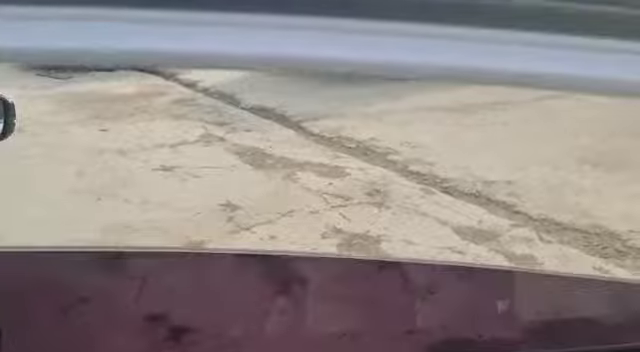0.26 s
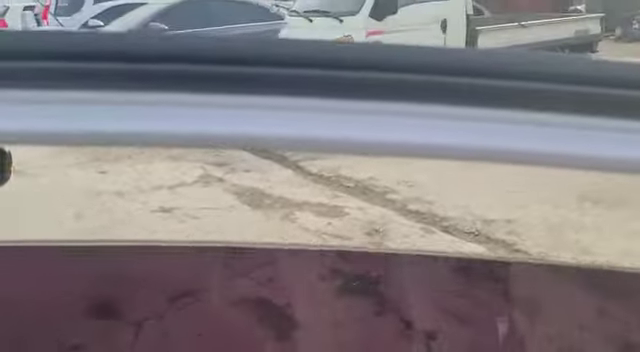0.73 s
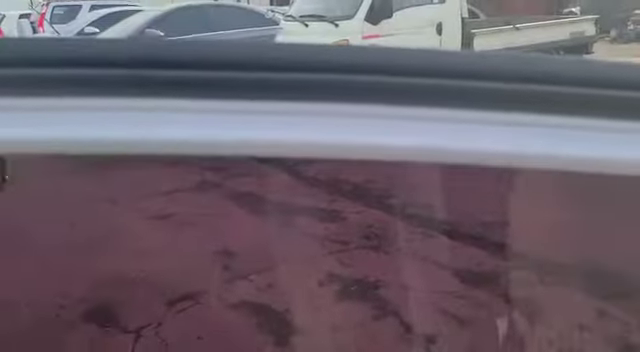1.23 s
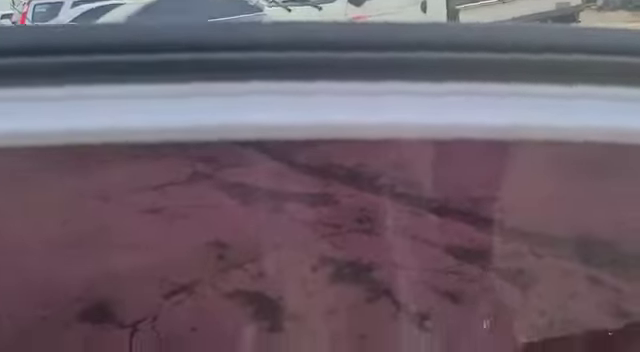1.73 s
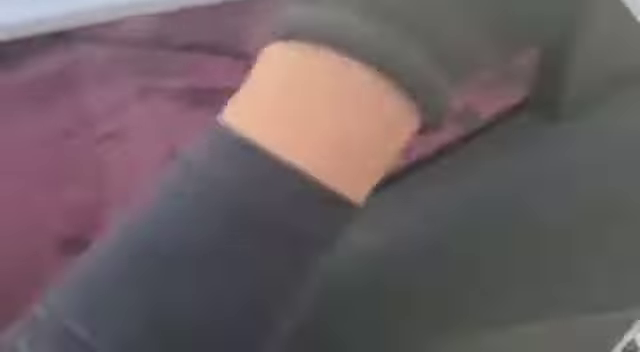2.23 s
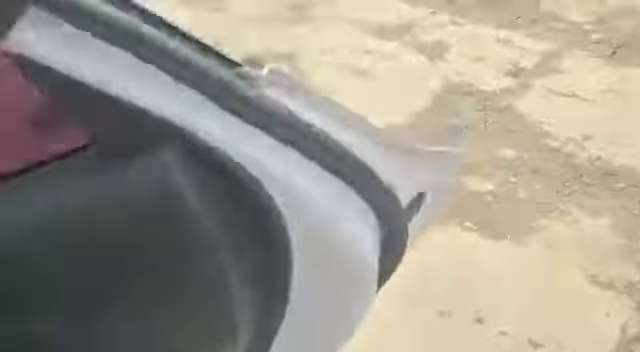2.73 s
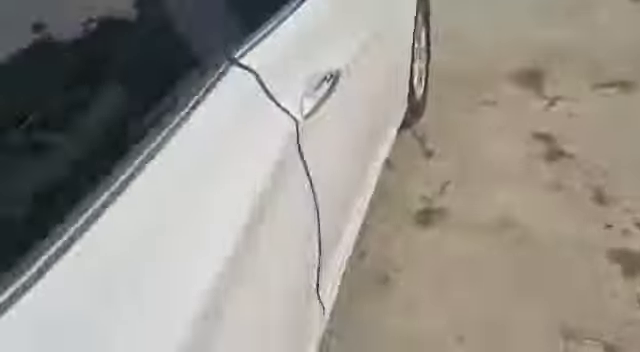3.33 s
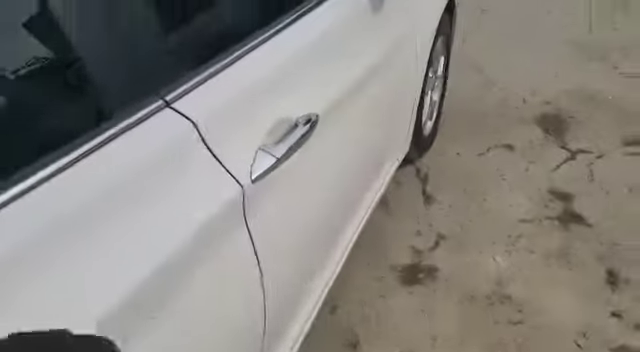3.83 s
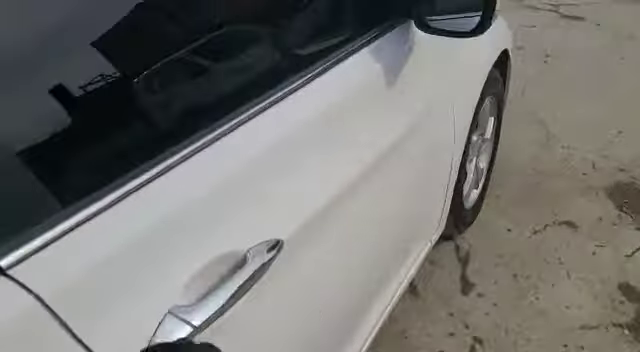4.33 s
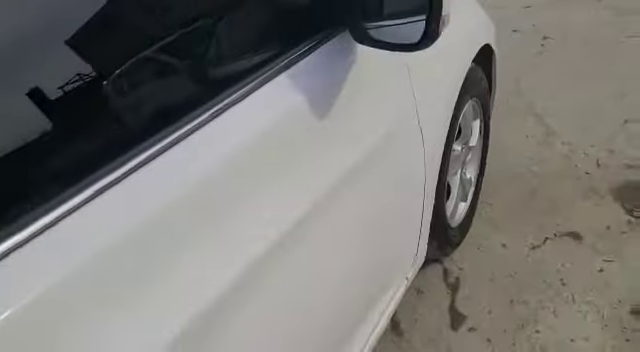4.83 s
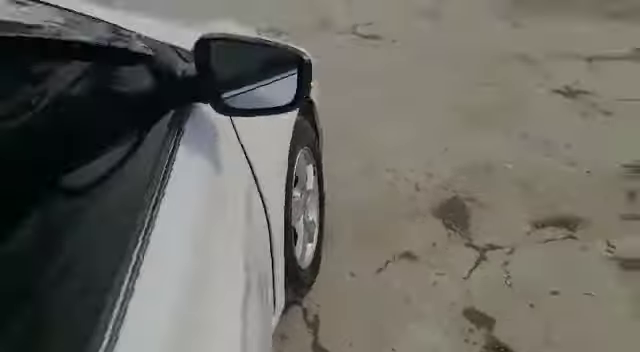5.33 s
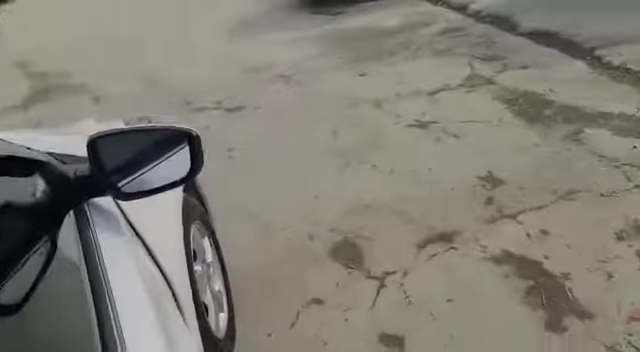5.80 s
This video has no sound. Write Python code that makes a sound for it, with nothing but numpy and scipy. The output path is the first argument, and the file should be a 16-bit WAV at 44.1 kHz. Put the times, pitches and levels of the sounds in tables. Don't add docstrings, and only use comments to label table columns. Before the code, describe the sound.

Beside an idling engine, an electric window closes with a squeak and thump; fabric rubs, a car door slams hard, then latch clacks and small ticks.

```python
import sys
import numpy as np
from scipy import signal
from scipy.fft import rfft, irfft, next_fast_len
from scipy.io import wavfile

SR = 44100
rng = np.random.default_rng(int(sys.argv[2]) if len(sys.argv) > 2 else 0)


def volts_from_db(level):
    exponent = np.asarray(level, float) / 20
    return 10 ** exponent


def transcribe(signal):
    frames = np.atleast_2d(signal).T
    limited = np.clip(frames, -1, 1)
    pcm = np.round(limited * 32767).astype(np.int16)
    wavfile.write(sys.argv[1], SR, pcm)


N = 267246


def rms_one(x):
    return x / np.sqrt(np.mean(x ** 2) + 1e-20)


def in_time(rows):
    s, *columns = np.transpose(rows)
    return [np.interp(np.arange(N) / SR, s, c) for c in columns]


def at_hz(points, hz):
    points = np.array(points)
    return np.interp(np.log(hz), np.log(points[:, 0]), points[:, 1])


def drift(rate_hz):
    r = np.exp(-80 * np.pi * rate_hz / SR)
    white = rng.standard_normal(N // 40 + 2002)
    slow = signal.lfilter([1], [1, -2 * r, r * r], white)[2000:]
    return np.interp(np.arange(N) / 40, np.arange(len(slow)), rms_one(slow))


def resonate(x, hz, width_hz):
    r = np.exp(-np.pi * width_hz / SR)
    zeros = (1 - r * r) / 2 * np.array([1, 0, -1])
    return signal.lfilter(zeros, [1, -2 * r * np.cos(2 * np.pi * hz / SR), r * r], x)


def through(x, resonances):
    return sum((-1) ** k * volts_from_db(db) * resonate(x, hz, width)
               for k, (hz, width, db) in enumerate(resonances))


def orders(hz, table, wobble_db):
    turn = 2 * np.pi * np.cumsum(hz) / SR
    out = 0
    for multiple, db in table:
        level = np.sqrt(2) * volts_from_db(db + wobble_db * drift(0.87))
        out = out + level * np.sin(multiple * turn + rng.uniform(0, 2 * np.pi))
    return out


def strokes(rows, column=3):
    t = np.arange(N) / SR
    out = 0
    for row in rows:
        peak_s, swell_s, fade_s = row[:3]
        away = np.maximum((peak_s - t) / swell_s, (t - peak_s) / fade_s)
        out = out + volts_from_db(row[column] - 20 * away)
    return out


# frequency in Hz, density in dB per Hz.
RUMBLE_COLOUR = [(20, -1.5), (60, -7.5), (90, -13.5), (160, -17.5), (250, -18), (330, -14.5), (470, -15),
                 (560, -12.5), (650, -18), (750, -20.5)]
# frequency in Hz, density in dB per Hz.
HISS_COLOUR = [(700, 1.5), (800, 4), (1000, 4), (1600, 4), (2400, 1.5), (3300, -2.5), (5000, -8.5),
               (6700, -1.5), (7500, -4.5), (8500, -17), (11500, -6), (15000, -11), (15800, -9),
               (16200, -50)]
# frequency in Hz, likeness from 0 to 1.
PORT_LIKENESS = [(30, 0.69), (250, 1), (700, 0.36), (1500, 0.05), (3000, 0.063), (6000, 0.22),
                 (12000, 0.08)]
# time in seconds, level in dB.
TRAFFIC_LEVEL = [(0, -42), (1.6, -41.5), (1.96, -44), (2.2, -39), (2.55, -46), (3.4, -39.5), (3.8, -45),
                 (4.12, -52), (4.5, -44), (5.2, -37), (6.06, -43.5)]
# time in seconds, level in dB about the mean.
LOT_OPENNESS = [(0, 1.5), (1.3, 2.5), (1.96, -2), (2.2, 0.5), (2.85, 3), (3.0, -.5), (3.36, 2), (3.7, -2.5),
                (4.5, 1.5), (5.0, 1), (5.7, -1.5), (6.06, -3.5)]


def air(patchy_db):
    size, join_hz = next_fast_len(N), 700
    hz = np.maximum(np.fft.rfftfreq(size, 1 / SR), 10)
    join_db = at_hz(RUMBLE_COLOUR, join_hz) - at_hz(HISS_COLOUR, join_hz)
    colour_db = np.where(hz < join_hz, at_hz(RUMBLE_COLOUR, hz), at_hz(HISS_COLOUR, hz) + join_db)
    colour = volts_from_db(colour_db) * (hz > 15)
    alike = np.clip(at_hz(PORT_LIKENESS, hz), 0, 1)
    mid, side = rfft(rng.standard_normal((2, size))) * colour
    pair = np.sqrt(1 + alike) * mid + np.sqrt(1 - alike) * side * np.array([[1], [-1]])

    (traffic_db,), (open_db,) = in_time(TRAFFIC_LEVEL), in_time(LOT_OPENNESS)
    # level in dB, share of the openness swing
    hisses = [(-47, 0.98), (-52.5, 1), (-60, 1.27)]
    levels_db = [traffic_db] + [db + share * open_db for db, share in hisses]
    edges_hz, out = [8, 250, 2500, 8500, SR], 0
    for low, high, db in zip(edges_hz, edges_hz[1:], levels_db):
        cuts = np.geomspace(low, high, 4)
        bands = 0
        for a, b in zip(cuts, cuts[1:]):
            share = 1 / (1 + (a / hz) ** 8) - 1 / (1 + (b / hz) ** 8)
            bands = bands + irfft(pair * share, size)[:, :N] * volts_from_db(patchy_db * drift(3.0))
        out = out + volts_from_db(db) * rms_one(bands)
    return out


# time in seconds, firing rate in Hz, level in dB.
IDLE_SPEED = [(0, 22.17, -45), (1, 21.92, -42), (2, 22.1, -43.5), (3, 22.06, -40.5), (3.6, 21.76, -50.5),
              (4.2, 21.94, -44), (5, 22.44, -46.5), (6.06, 21.94, -46.5)]
# multiple of the firing rate, level in dB.
FIRING_ORDERS = [(1, -16), (2, -2.5), (2.63, -12), (3, -2.5), (4, -6.5), (5, -11.5), (6, -15.5), (7, -15.5),
                 (10, -20.5)]
# frequency in Hz, width in Hz, level in dB.
BELT_WHIRR = [(532, 21.6, -59.5), (646.4, 24, -59)]


def engine():
    hz, db = in_time(IDLE_SPEED)
    whirr = 0
    for whirr_hz, width, whirr_db in BELT_WHIRR:
        white = rng.standard_normal(N)
        narrow = resonate(resonate(white, whirr_hz, width), whirr_hz, width)
        whirr = whirr + volts_from_db(whirr_db) * rms_one(narrow)
    hunting = 1 + .006 * drift(1.5)
    return volts_from_db(db) * orders(hz * hunting, FIRING_ORDERS, wobble_db=1.0) + volts_from_db(db + 46) * whirr


# frequency in Hz, width in Hz, level in dB.
BRIGHT_BODY = [(3670, 4500, 0), (6250, 840, 7), (7080, 360, 6)]
# frequency in Hz, width in Hz, level in dB.
TOP_BODY = [(11200, 4200, 1), (13800, 2000, 0.5), (15900, 250, 10)]
# peak in seconds, swell and fade in seconds, rub in dB, fibre hiss in dB.
SEAT_RUBS = [(2.1, 0.26, 0.24, -60, -57), (2.36, 0.55, 0.48, -53.5, -53), (2.6, 0.21, 0.14, -40, -46),
             (2.8, 0.12, 0.13, -46.5, -46), (2.91, .3, 0.037, -62, -50), (3.44, 0.12, 0.044, -45, -49)]
# peak in seconds, swell and fade in seconds, rub in dB,
# finest hiss in dB.
SLEEVE_RUBS = [(2.55, 0.13, 0.22, -65, -78), (3.0, 0.083, .4, -54, -57), (3.27, 0.31, 1, -47.5, -59),
               (4.3, .2, 0.4, -61, -70)]


def cloth():
    slipping = rng.random(N) < 12000 / SR
    slip_db = 2.0 * np.minimum(rng.exponential(1, N), 5)
    slips = slipping * volts_from_db(slip_db) * rng.choice([-1, 1], N)
    slips = slips * volts_from_db(1.7 * drift(20))
    seat_rub = rms_one(resonate(resonate(slips, 1140, 450), 1140, 450))
    sleeve_rub = rms_one(through(slips, [(1580, 140, -2), (1890, 250, -0.5), (2200, 2300, -9)]))
    finest = through(slips, TOP_BODY)
    fibre_hiss = rms_one(through(through(slips, BRIGHT_BODY), [(7300, 3500, 0)]) + 0.35 * finest)
    seat = strokes(SEAT_RUBS) * seat_rub + strokes(SEAT_RUBS, -1) * fibre_hiss
    return seat + strokes(SLEEVE_RUBS) * sleeve_rub + strokes(SLEEVE_RUBS, -1) * rms_one(finest)


# peak in seconds, swell and fade in seconds, level in dB.
GLASS_SLIDES = [(.62, .4, 0.51, -49), (1.3, 1, 0.3, -46.5)]


def glass():
    white = rng.standard_normal((2, N)) * volts_from_db(3.0 * drift(9.1))
    hiss = through(white, BRIGHT_BODY) + volts_from_db(-8) * through(white, TOP_BODY)
    return strokes(GLASS_SLIDES) * rms_one(hiss)


# start in seconds, length in seconds, pitch in Hz, level in dB.
SEAL_SQUEAKS = [(.5, .12, 5830, -58), (1.108, 0.082, 3460, -55), (1.21, .03, 3440, -59),
                (1.28, 0.12, 3400, -61), (1.423, 0.012, 6090, -31.5), (1.463, .03, 3340, -51),
                (1.51, 0.037, 3460, -59), (1.58, 0.073, 3480, -53)]


def squeaks():
    t = np.arange(N) / SR
    waver = np.cumsum(1 + 0.004 * drift(28)) / SR
    out, ramp_s = 0, 0.0061
    for s, length, hz, db in SEAL_SQUEAKS:
        gate = np.clip(np.minimum(t - s, s + length - t) / ramp_s, 0, 1)
        out = out + np.sqrt(2) * volts_from_db(db) * gate * np.sin(2 * np.pi * hz * waver)
    return out


# time in seconds, commutator tone in Hz, level in dB.
MOTOR_SPEED = [(0, 523.5, -44), (.3, 536.2, -38.5), (.5, 554, -41), (.72, 561.3, -47.5), (.86, 569.5, -57),
               (1.1, 566.6, -45), (1.25, 581, -47), (1.43, 585, -53)]
# multiple of the commutator tone, level in dB.
WHINE_ORDERS = [(.76, -15), (1, -2), (1.4, -22), (2.0, -24), (2.719, -20), (3.04, -13.5)]


def motor():
    hz, db = in_time(MOTOR_SPEED)
    stop_s = MOTOR_SPEED[-1][0]
    running = np.clip((stop_s - np.arange(N) / SR) / .02, 0, 1)
    jitter = 1 + .003 * drift(15)
    return running * volts_from_db(db) * orders(hz * jitter, WHINE_ORDERS, wobble_db=0.2)


def lot(x):
    t60_s, build_s, level_db = 0.087, 0.0095, -13.5
    t = np.arange(round(.3 * SR)) / SR
    scatter = rng.standard_normal((2, len(t))) * volts_from_db(-60 * t / t60_s) * np.minimum(t / build_s, 1)
    scatter = signal.lfilter([.4], [1, -.6], scatter)
    scatter = scatter / np.sqrt(np.sum(scatter ** 2, axis=1, keepdims=True))
    return x + volts_from_db(level_db) * signal.fftconvolve(x, scatter, axes=1)[:, :N]


# frequency in Hz, width in Hz, level in dB.
LATCH_BODY = [(685, 275, -0.5), (1080, 430, -1.5), (1590, 350, 2), (2300, 470, -1), (2710, 1270, -6.5)]
# time in seconds, peak in dB, brightness in dB.
SEAL_CONTACTS = [(1.411, -36, -4), (1.423, -41, 7), (1.446, -36.5, -0.5), (1.467, -52, 6)]
SWITCH_CONTACTS = [(1.7745, -21, 1.8)]
HANDLE_CONTACTS = [(2.317, -32.5, -11), (3.14, -52, -14)]
SLAM_CONTACTS = [(3.441, -25.5, -14), (3.447, -12.5, -18), (3.478, -14, -9.5), (3.502, -35, -16),
                 (3.516, -25.5, -23)]
CLAW_CONTACTS = [(3.455, -13.5, -14.5)]
KEY_CONTACTS = [(4.257, -37.5, -3), (4.269, -56, -2.5), (4.298, -41, -14), (4.33, -39.5, -1)]
LOCK_CONTACTS = [(4.893, -35, -18), (4.91, -37.5, -7), (4.963, -20.5, -23.5), (4.995, -30, -16),
                 (5.017, -32.5, -9), (5.059, -32.5, -18), (5.097, -36, -13), (5.262, -34, -3)]
BOLT_CONTACTS = [(5.283, -9.5, -6.5), (5.311, -27.5, -15)]
MIRROR_CONTACTS = [(5.565, -34, -8), (5.588, -36, -2.5), (5.606, -56, -12), (5.699, -51.5, 7),
                   (5.784, -50.5, 4), (5.809, -55, -15), (5.841, -50, 0)]
# contacts, top part against the bright part in dB, ring in seconds,
# left-right in dB, pitch as a share of the latch.
OBJECTS = [
    (SEAL_CONTACTS, -30, 0.083, -9.5, 1.17),
    (SWITCH_CONTACTS, 1.5, 0.032, -9, 1.06),
    (HANDLE_CONTACTS, -17, 0.022, 1.5, 1.9),
    (SLAM_CONTACTS, -26, 0.031, -11.5, 1.09),
    (CLAW_CONTACTS, -27, 0.062, 9.3, 0.68),
    (KEY_CONTACTS, -2, 0.031, -16, 0.93),
    (LOCK_CONTACTS, -22, .035, -7, 0.85),
    (BOLT_CONTACTS, -6, 0.017, -7.5, 0.85),
    (MIRROR_CONTACTS, -10, 0.064, -5, 1.05),
]


def ticks():
    hold_s, soft_attack_s, hard_db = 0.0022, 0.0028, -27
    out, t = np.zeros((2, N)), np.arange(round(.2 * SR)) / SR
    dull = signal.butter(2, 3500, fs=SR, output="sos")
    for contacts, top_db, ring_s, pan_db, pitch in OBJECTS:
        metal = np.multiply(LATCH_BODY, [pitch, pitch, 1])
        for s, db, bright_db in contacts:
            white = rng.standard_normal(len(t))
            # sound, level in dB, share of the ring
            parts = [(signal.sosfilt(dull, through(white, metal)), db, 1.3),
                     (through(white, BRIGHT_BODY), db + bright_db + 2.0, .7),
                     (through(white, TOP_BODY), db + bright_db + top_db - 2.5, .6)]
            softness = np.clip((hard_db - db) / 20, 0, 1)
            attack = np.minimum(t / (0.0015 + soft_attack_s * softness), 1)
            dying = np.maximum(t - hold_s, 0) / ring_s
            hit = sum(volts_from_db(d - 60 * dying / share) * rms_one(part) for part, d, share in parts)
            i = round(s * SR)
            out[:, i:i + len(t)] += (hit * attack)[:N - i] * volts_from_db([[pan_db / 2], [-pan_db / 2]])
    return out


# frequency in Hz, level in dB, t60 in seconds.
DEEP_MODES = [(27, 1, 0.2), (52.4, 7.5, 0.16), (63.6, -8.5, 0.71), (96.2, -2, 0.24), (124.7, 8, 0.1)]
# frequency in Hz, level in dB, t60 in seconds.
PANEL_MODES = [(164.4, -4, 0.19), (205, -3.5, 0.12), (258, -4.5, 0.12), (337, -6, 0.16),
               (398.5, 4.5, 0.051), (491.6, -8, 0.17), (570.4, -2, 0.083), (692, -3, 0.13),
               (867, -10, 0.17), (949, 1, 0.07)]
# time in seconds, peak in dB, deep part in dB,
# panel pitch in Hz.
STOP_BLOWS = [(1.405, -32, -38, 202), (1.42, -38, -23, 201), (1.446, -5, -49, 273), (1.454, -24, -35, 337),
              (1.462, -14, -26, 360), (1.483, -21, -33, 277), (1.504, -27, -35, 269)]
CABIN_BLOWS = [(1.775, -24.5, -46, 370), (2.994, -34, -57, 367)]
SLAM_BLOWS = [(3.449, -9, -16, 604), (3.454, -1.5, -39, 205), (3.468, -16.5, -5, 248),
              (3.496, -6.5, -8, 202), (3.546, -17, -14, 200), (3.598, -31, -20.5, 250)]
LOCK_BLOWS = [(4.908, -32, -49, 366), (4.926, -25, -33, 393), (4.959, -25, -45, 375),
              (4.969, -10.5, -17, 203), (4.987, -19, -26, 205), (5.02, -23.5, -25, 258),
              (5.058, -29, -47, 424)]
BOLT_BLOWS = [(5.283, -18.5, -20, 447), (5.291, -12, -25, 400), (5.317, -15.5, -18.5, 180)]
MIRROR_BLOWS = [(5.566, -37.5, -45, 337), (5.574, -24, -44, 282), (5.599, -26, -52, 251)]
SLAM_AIR = [(3.46, -60, -13, 206)]
# blows, share of the ring, deep pitch in Hz,
# loss in dB per octave away from the struck pitch.
ACTIONS = [
    (STOP_BLOWS, 0.64, 120, 27),
    (CABIN_BLOWS, 1, 130, 6.2),
    (SLAM_BLOWS, 0.71, 67.3, 13.2),
    (LOCK_BLOWS, 0.87, 87, 9.9),
    (BOLT_BLOWS, .98, 143, 5.5),
    (MIRROR_BLOWS, 0.78, 55, 12.4),
    (SLAM_AIR, .9, 30, 9),
]


def thuds():
    start_delay_s = 0.00246
    deep_off_db = 12.5
    build_turns = 0.24
    out, t = np.zeros(N), np.arange(round(.5 * SR)) / SR
    for blows, ring_share, deep_hz, off_db in ACTIONS:
        for s, db, deep_db, panel_hz in blows:
            modes = [(f, d + deep_db + 0.5 - deep_off_db * abs(np.log2(f / deep_hz)), t60)
                     for f, d, t60 in DEEP_MODES]
            modes += [(f, d + db - 3.0 - off_db * abs(np.log2(f / panel_hz)), t60)
                      for f, d, t60 in PANEL_MODES]
            hit = 0
            for f, d, t60 in modes:
                level = volts_from_db(d + rng.normal(0, 2.0) - 60 * t / (t60 * ring_share))
                hit = hit + level * np.sin(2 * np.pi * f * t) * (1 - np.exp(-f * t / build_turns))
            i = round((s + start_delay_s) * SR)
            push = 1 if 3.44 < s < 3.48 else -1
            out[i:i + len(t)] += push * hit[:N - i]
    return signal.sosfilt(signal.butter(2, 900, fs=SR, output="sos"), out)


# time in seconds, left-right of the highs in dB, left lag in samples.
MICROPHONE_TURN = [(0, -7, 9), (1, -7.5, 6), (2.2, -10.5, 3.5), (3, -9, 9), (3.4, -7, -11.5), (3.8, -8, 0),
                   (4.2, -6, 12.5), (4.9, -7.5, 10.5), (5.2, -5.5, -2.5), (5.7, -12, -1.5)]


def scene():
    high_pan_db, lag = in_time(MICROPHONE_TURN)
    low_pan_db = -2.5
    around = air(patchy_db=2.43) + engine() + cloth() + glass() + squeaks() + motor() + thuds()
    lows = signal.sosfilt(signal.butter(1, 700, fs=SR, output="sos"), around)
    highs = around - lows
    sides = np.array([[.5], [-.5]])
    left, right = lows * volts_from_db(sides * low_pan_db) + highs * volts_from_db(sides * high_pan_db) + lot(ticks())
    return np.array([np.interp(np.arange(N) - lag, np.arange(N), left), right])


def band_limit(x):
    return signal.sosfilt(signal.butter(12, 16450, fs=SR, output="sos"), x)


def record(dry):
    rounded = 1.071 * np.tanh(dry / 1.052)
    mix = signal.sosfilt(signal.cheby2(8, 40, 16700, fs=SR, output="sos"), rounded)
    return band_limit(mix)


dry = scene()
out = record(dry)
transcribe(out)
```